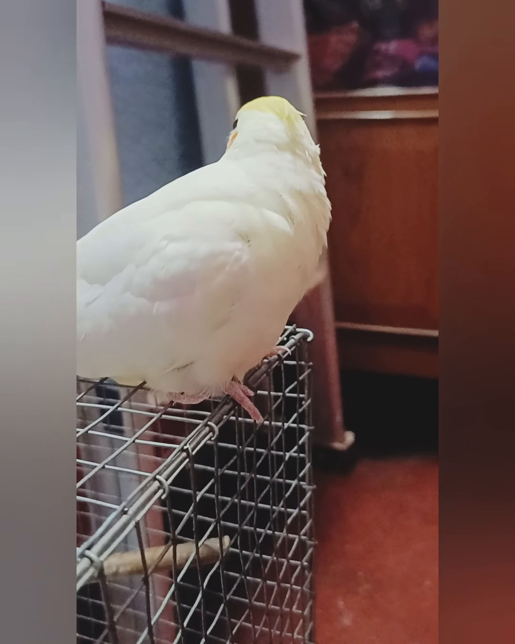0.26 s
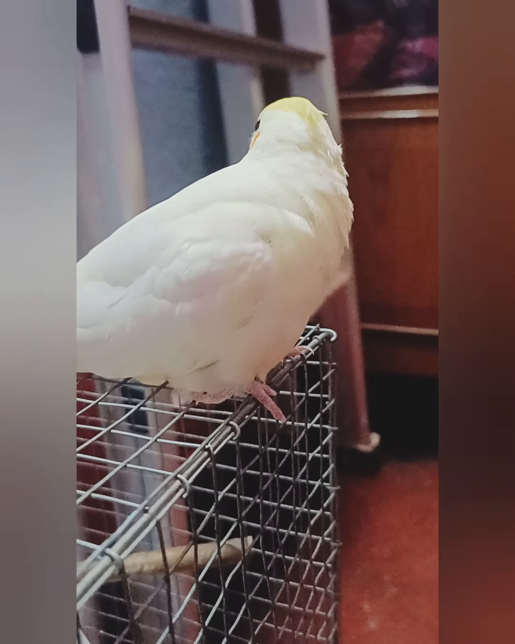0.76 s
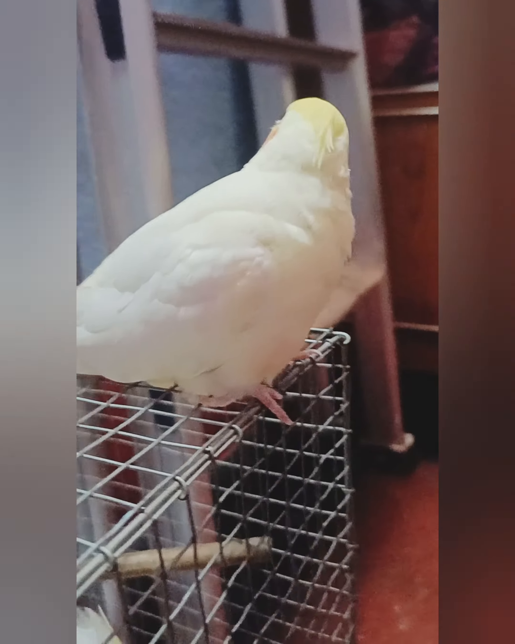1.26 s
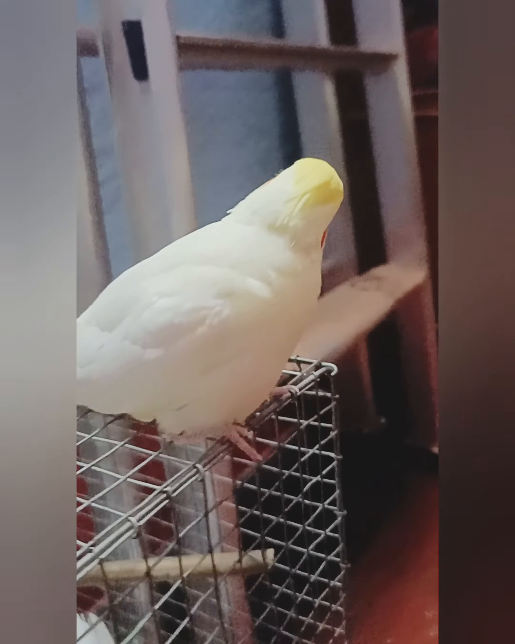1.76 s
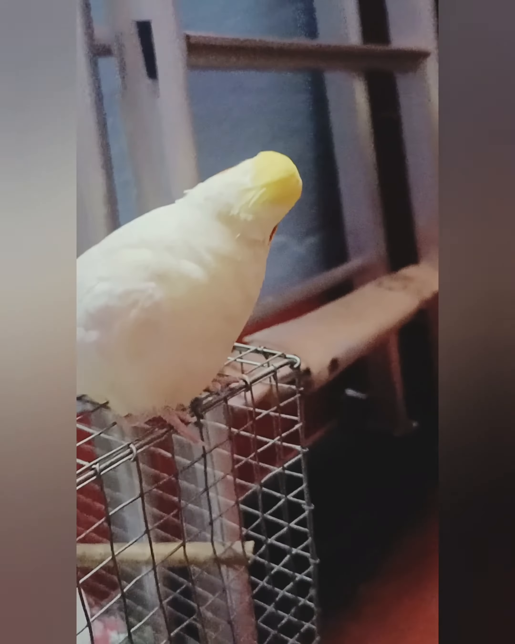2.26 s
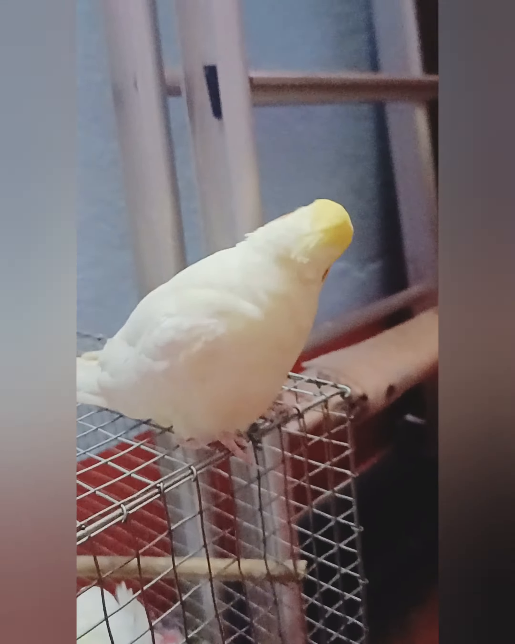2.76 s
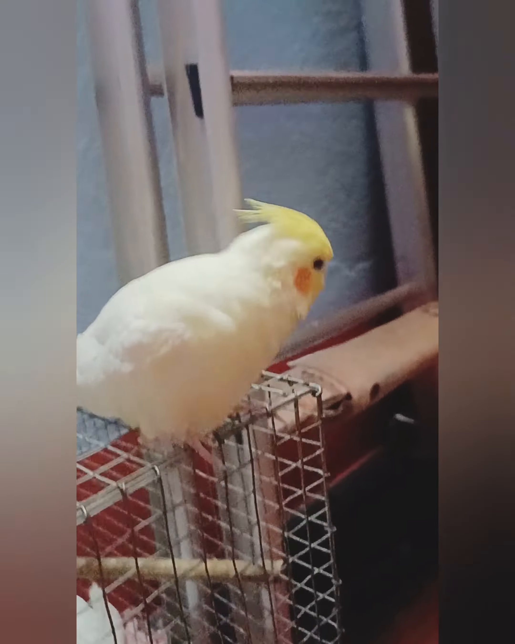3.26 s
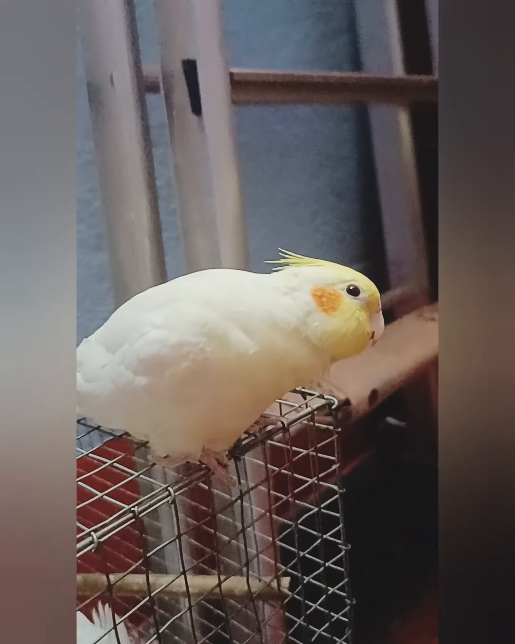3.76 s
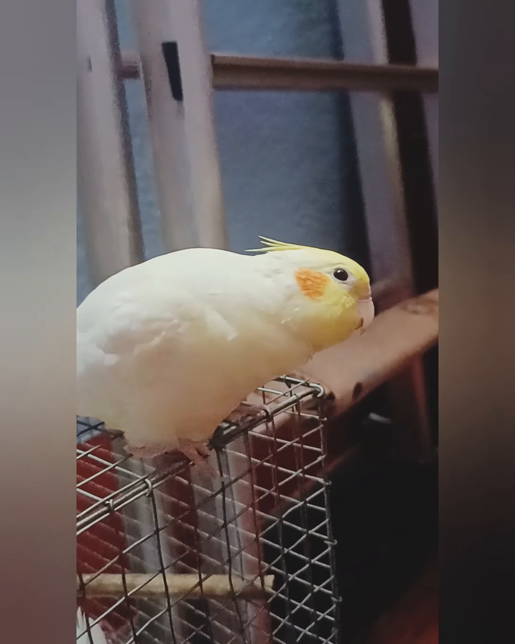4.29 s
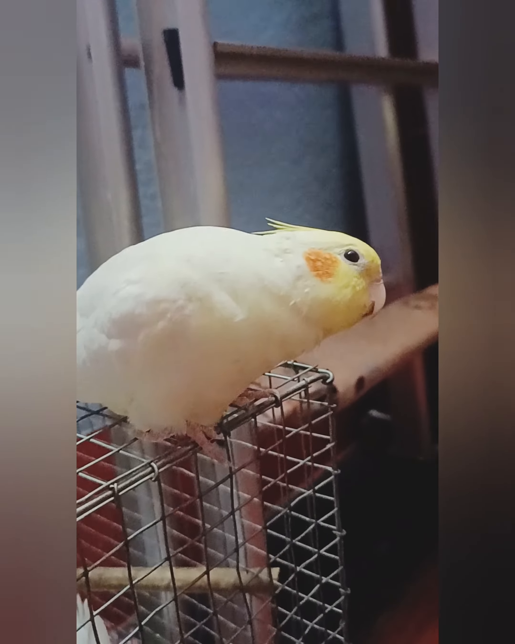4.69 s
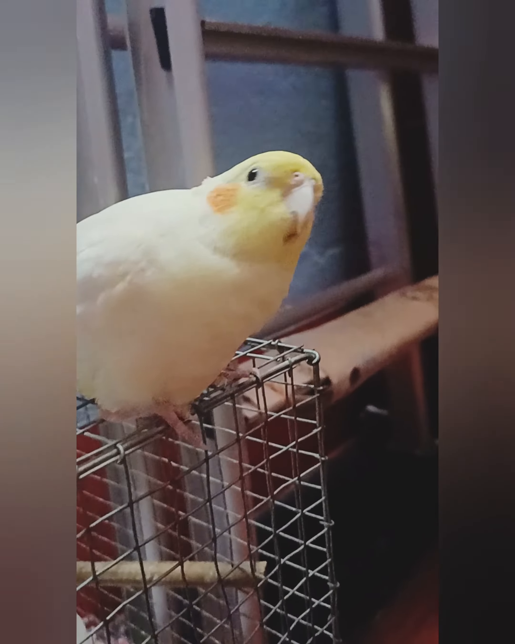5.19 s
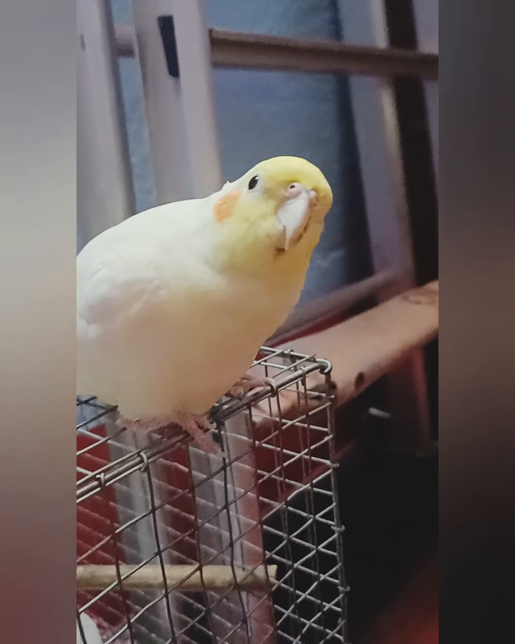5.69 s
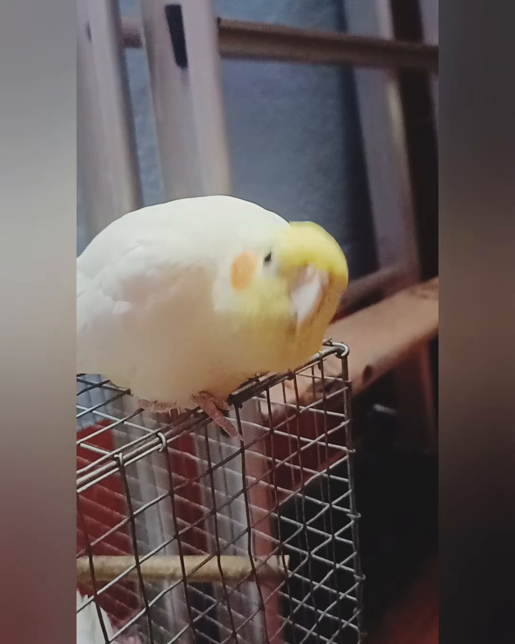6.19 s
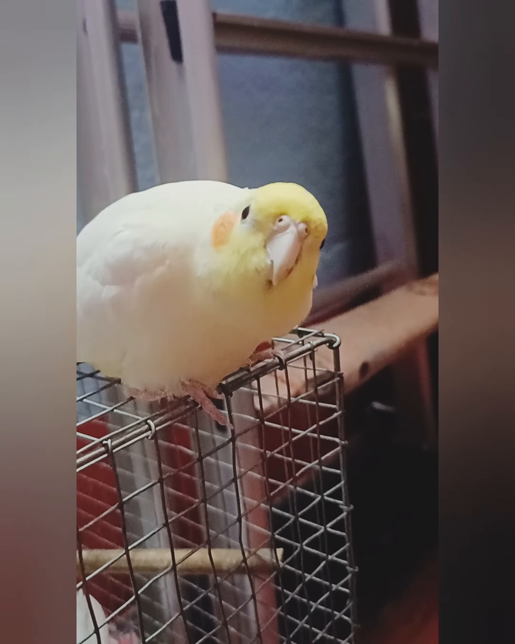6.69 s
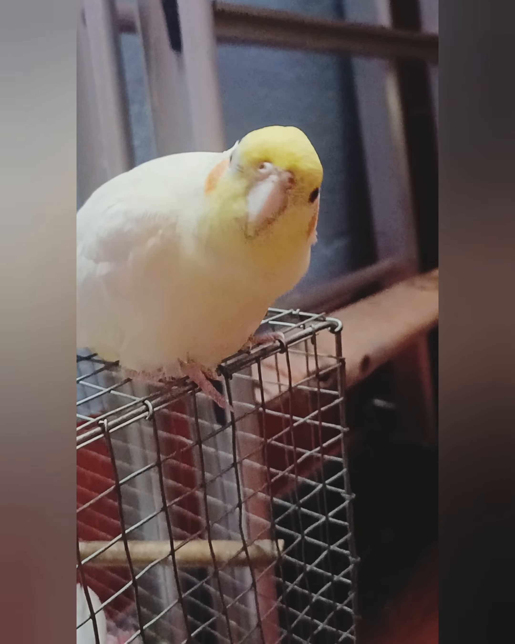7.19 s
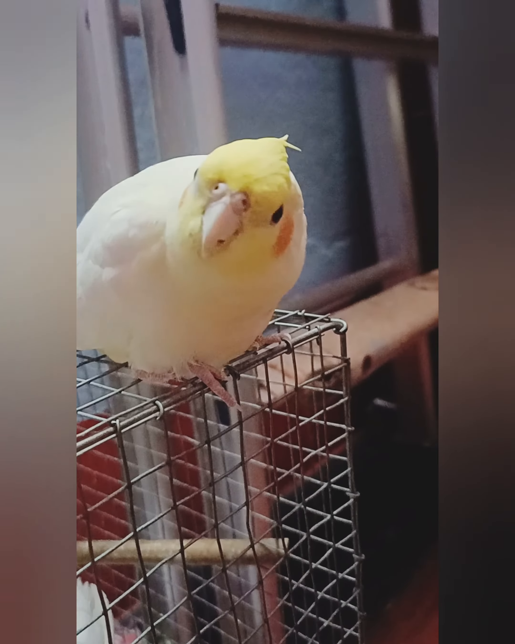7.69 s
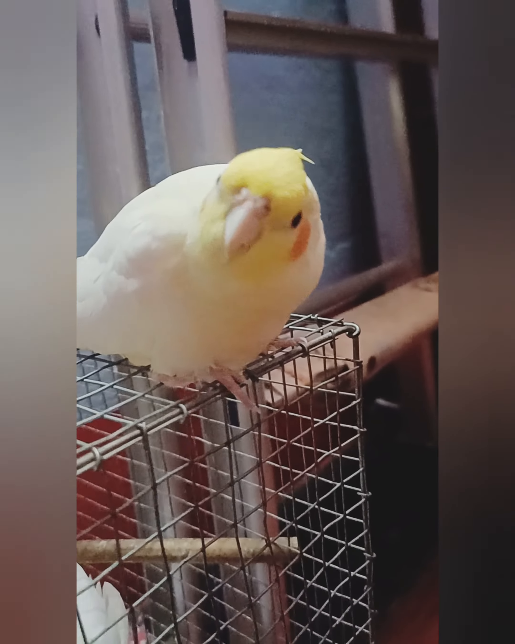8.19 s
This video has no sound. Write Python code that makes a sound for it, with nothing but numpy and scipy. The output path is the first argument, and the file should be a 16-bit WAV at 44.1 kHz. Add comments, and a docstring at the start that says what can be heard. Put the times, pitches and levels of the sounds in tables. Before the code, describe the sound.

Close, soft chirps and scratchy squeaks from a pet parrot lead to four raspy calls over a dull household hum.

```python
"""A cockatiel calls from its wire cage in a quiet room, close to a two-port microphone and a little left.
Air drives the membranes of its syrinx into oscillation: soft, mostly falling chirps, a two-voiced whine
with combination tones, a sharp chip and scratchy squeaks, then four harsh grumbles in which uneven
membrane slaps modulate the whistle. A faint feather rustle, brief handling noise and dry taps join in,
and the furniture reflects each sound over a dull household hum."""
import sys
import numpy as np
from scipy import signal
from scipy.fft import rfft, irfft, next_fast_len
from scipy.io import wavfile
from scipy.ndimage import uniform_filter1d, map_coordinates

SR = 44100
rng = np.random.default_rng(int(sys.argv[2]) if len(sys.argv) > 2 else 0)


def wrap_up_sound(samples):
    """Save the sound to the file named by the first command line argument, as 16-bit audio."""
    columns = np.atleast_2d(samples).T
    # keep every value between -1 and 1, then stretch to whole-number steps
    tamed = np.clip(columns, -1, 1)
    steps = np.round(tamed * 32767).astype(np.int16)
    wavfile.write(sys.argv[1], SR, steps)


N = 372644
T = np.arange(N) / SR

# Resonances of the throat: frequency_hz, gain_db
THROAT_RESPONSE = [(300, -14), (700, -18.5), (1000, -3), (1250, 1.5), (1600, 1.5), (1950, -8), (2150, -4.5),
                   (2900, -11.5), (4000, -18.5), (6500, -30)]
# Noise spectra of the membrane ticks, the wheeze and the open beak: frequency_hz, density_db
TICK_SPECTRUM = [(2000, -43), (2800, -8), (3600, 5), (5200, -16), (6500, -26.5), (7400, -8), (8400, 6.5),
                 (9500, 6.5), (10700, -7), (12600, -19), (13600, -33), (15500, -29)]
WHEEZE_SPECTRUM = [(40, -23.5), (90, 8), (250, 0), (600, 4), (1100, 5), (1900, 6.5), (2600, 0.5),
                   (3600, -9.5), (5200, -26), (6500, -51), (9000, -33), (15000, -57)]
GAPE_SPECTRUM = [(700, -3.5), (1000, -26), (1400, 10), (1900, 17.5), (2700, 12), (3200, -44), (4200, -4),
                 (5100, 3.5), (6500, -93.5), (9500, -12), (12400, 1.5), (14000, -36), (15500, -32)]
def grumbles(flutter_hz=78, interval=1.46, kick_rad=.95, bend_rad=2.5, gain_db=2,
             octave_db=-5, sum_db=-4, third_db=-28, fourth_db=-20, wheeze_db=-20, gape_db=-4):
    """Amplitude and phase modulation: rattle and flutter spread two whistles into harsh sidebands."""
    level, pitch_hz, rough, flutter, gape, tick_db, second_db = grumble_controls()
    swing, tick, kick, cycle = rattle()
    chop = np.clip(rough, 0, 1)
    # each slap holds the whistle back and it runs sharp until the next, lifting the upper sidebands
    slap_phase = chop * (kick_rad * kick + bend_rad * uniform_filter1d(cycle, size=24))
    low = phase_of(pitch_hz * (1 + 0.03474 * chop * drift(62.4))) + slap_phase
    high = phase_of(interval * pitch_hz * (1 + 0.0184 * drift(107)))
    second = from_db(second_db) * (np.sin(high) + from_db(sum_db) * np.sin(low + high))
    whistle = colour(np.sqrt(2) * (1 - chop + chop * swing) * (np.sin(low) + second), THROAT_RESPONSE)
    # the opening beak frees the even harmonics
    even = from_db(octave_db) * np.sin(2 * low) + from_db(fourth_db) * np.sin(4 * low)
    overtones = swing * (gape * even + (1 - gape) * from_db(third_db) * np.sin(3 * low))
    ticks = from_db(tick_db) * rms_one(colour(tick * rng.standard_normal(N), TICK_SPECTRUM))
    wheeze = from_db(wheeze_db) * np.sqrt(chop) * noise(WHEEZE_SPECTRUM)
    air = swing * (wheeze + from_db(gape_db) * gape * noise(GAPE_SPECTRUM))
    throb = np.abs(np.sin(phase_of(flutter_hz * (1 + 0.22 * drift(24.95))) / 2)) * np.sqrt(2)
    envelope = from_db(gain_db) * level * (1 - flutter + flutter * throb)
    return envelope * (whistle + overtones + ticks + air)


# Harsh calls: start_s, length_s, attack_s, release_s, pitch_hz, end_bend_hz, relative_db,
# swell_db_per_s, flutter_s, rattle_share, gape_share, tick_db, second_voice_db
GRUMBLE_CALLS = [(6.418, .207, 0.11, 0.032, 1287, 14.5, -45, 1, 0.086, 0.91, 0.14, -21.5, -14.5),
                 (6.712, .255, 0.034, 0.064, 1275, 170, -45.5, 29, 0.00092, 1, 0.22, -13, -13),
                 (7.529, .142, .058, 0.008, 1213, -100, -46, 2, 0.152, 0.65, .06, -23.5, -22),
                 (7.85, 0.53, 0.038, 0.017, 1253, -0.5, -41.5, 23, .14, 0.56, 0.05, -22, -24.5)]
# The last grumble clears, then the beak opens for a screech:
# time_s, shift_hz, change_db, added_rattle_share, added_gape_share
SCREECH_CURVE = [(8.18, -0.5, -1.5, -0.015, 0), (8.245, -40, 2.5, -0.37, 0.024), (8.29, 40, -2, -.05, 0.26),
                 (8.343, 90.5, -6.5, 0.16, 0.28), (8.365, -1, -2, 0.069, 0)]
def grumble_controls(bend_s=.08, flutter_depth=.8, fade_s=.04, swoop_s=.03, clear_s=0.086):
    """Slow modulation: a grumble stutters, a little flat, until the air flows freely."""
    controls = np.zeros((7, N))
    for (start, length, attack, release, hz, bend_hz, db, swell,
         flutter_s, rough, gape, tick_db, second_db) in GRUMBLE_CALLS:
        at = slice(int(start * SR), int((start + length) * SR))
        age = T[at] - start
        shift_hz, change_db, more_rough, more_gape = in_time(SCREECH_CURVE, T[at])
        flutter = flutter_depth * ramp((flutter_s - age) / fade_s)
        # without a stutter it swoops in from above, with less rattle and a strong second voice
        direct = 1 - ramp(flutter_s / fade_s)
        swoop = direct * np.exp(-age / swoop_s)
        clear = direct * ramp(2 - 2 * age / clear_s)
        level = from_db(db + swell * (age - length / 2) + change_db)
        bent_hz = hz + bend_hz * ramp(1 + (age - length) / bend_s) + shift_hz
        controls[:, at] = (gate(age, 0, length, attack, release) * level,
                           bent_hz * (1 + .12 * swoop - .04 * flutter),
                           (rough + more_rough) * (1 - 0.61 * clear),
                           flutter,
                           gape + more_gape,
                           tick_db + 6.5 * flutter - 43 * more_gape,
                           second_db + 15 * clear + 66 * more_gape)
    return controls


def rattle(rate_hz=330, spread_db=2.0, tick_s=0.0019):
    """Impulse excitation: each uneven membrane slap leaves a decaying swing, a tick and a phase kick."""
    turns = phase_of(rate_hz * from_db(1.8 * drift(220) + .7 * drift(20))) / (2 * np.pi)
    count, cycle = turns.astype(int), turns % 1
    size, kick = rng.standard_normal((N // 20, 2))[count].T
    strength = from_db(spread_db * size)
    swing = uniform_filter1d(strength * np.exp(-2 * cycle), size=18)
    tick = strength * np.exp(-cycle / rate_hz / tick_s)
    return rms_one(swing), rms_one(tick), uniform_filter1d(kick, size=60), cycle


# Effort through the whine: time_s, low_voice_db, high_voice_db, roughness
WHINE_EFFORT = [(3.304, -51, -55.5, 0.8), (3.325, -47, -46.5, .7), (3.355, -41, -53, 0.12),
                (3.44, -41, -56, .06), (3.51, -42.5, -52.5, .25), (3.593, -39.5, -42.5, .28),
                (3.62, -37.5, -50.5, .1), (3.66, -32.5, -52, .1), (3.688, -41, -54.5, .14)]
def whine(start_s=3.304, end_s=3.689, low_jitter=0.0696, high_jitter=0.15, waver=0.0086, shimmer=1.1,
          octave_db=-20, third_db=-36, sum_db=-11, mirror_db=-4, wheeze_db=-28, gain_db=3):
    """Nonlinear coupling: the two sides of the syrinx share one air stream and make combination tones."""
    low_hz, high_hz = whine_pitches(start_s, end_s)
    low_db, high_db, rough = in_time(WHINE_EFFORT)
    low = phase_of(low_hz * (1 + low_jitter * rough * drift(207) + waver * drift(53.9) / 2))
    high = phase_of(high_hz * (1 + high_jitter * rough * drift(300) + waver * drift(37)))
    pressed_db = 0.96 * (low_db - np.median(np.array(WHINE_EFFORT)[:, 1]))   # harmonics grow with effort
    harmonics = from_db(octave_db) * np.sin(2 * low) + from_db(third_db) * np.sin(3 * low)
    lower = np.sin(low) + from_db(pressed_db) * harmonics
    lower *= 1 + shimmer * rough * np.tanh(drift(300))
    combinations = from_db(sum_db) * np.sin(low + high) + from_db(mirror_db) * np.sin(3 * low - high)
    upper = np.sin(high) + combinations
    voices = from_db(low_db + 1.5 * drift(35)) * lower + from_db(high_db + 1.4 * drift(60)) * upper
    air = from_db(low_db + wheeze_db) * noise(WHEEZE_SPECTRUM)
    return from_db(gain_db) * (colour(voices, THROAT_RESPONSE) + air) * gate(T, start_s, end_s, .004, .01)


def whine_pitches(start_s, end_s, swoop_s=0.031, base_hz=1103, top_hz=1247.7, top_s=3.5,
                  rise_hz_per_s=1150, sag_hz_per_s=520, high_hz=1670, wander=0.021):
    """Frequency glide: both voices swoop down, then the low one arches and the high one holds."""
    t = np.clip(T, start_s, end_s)
    swoop = 1 + .72 * np.exp(-((t - start_s) / swoop_s) ** 2)
    arch_hz = top_hz - np.maximum(rise_hz_per_s * (top_s - t), sag_hz_per_s * (t - top_s))
    return np.maximum(arch_hz, base_hz) * swoop, high_hz * swoop * (1 + wander * drift(14))


# Chips and squeaks: start_s, length_s, attack_s, low_hz, low_db, squeak_hz, squeak_db,
# roughness, overtone_db, hiss_db
CHIP_NOTES = [(0.144, 0.035, .006, 3320, -63, 4260, -69, 0.29, -34, -73.5),
              (0.811, 0.062, 0.019, 1822, -54.5, 3660, -67, 1.09, -9.5, -67),
              (3.26, 0.046, 0.0017, 1725, -60, 3000, -63, 0.75, -15, -74),
              (3.968, .019, .0011, 1737, -32.5, 3100, -53, 0.48, -15.5, -57),
              (4.209, 0.049, 0.0051, 1588, -59.5, 3127, -64.5, 0.95, -6, -83),
              (4.451, 0.044, 0.011, 1700, -69, 3090, -71, 0.6, -14, -85),
              (4.831, .062, 0.0023, 1810, -52.5, 5890, -58, 1.09, 0.5, -62.5),
              (5.828, 0.016, 0.0021, 1733, -67, 4004, -49.5, 0.57, -8, -64),
              (6.14, 0.032, 0.0027, 1501, -47.5, 3650, -56.5, 0.89, -12, -60.5)]
def chips(low_sag=.84, squeak_sag=0.79, fall_share=0.24, gain_db=-3):
    """Biphonation: a low voice and a squeak sound at once in abrupt notes, both sagging in pitch."""
    tone, air = np.zeros((2, N))
    low_wobble, high_wobble = membrane(), membrane()
    for (start, length, attack, low_hz, low_db, squeak_hz, squeak_db,
         rough, overtone_db, hiss_db) in CHIP_NOTES:
        at = slice(int(start * SR), int((start + length) * SR))
        shape = gate(T[at], start, start + length, attack, fall_share * length)
        low = note(low_hz, low_hz * low_sag, rough, low_wobble[:, at], overtone_db, overtone_db - 8)
        squeak = note(squeak_hz, squeak_hz * squeak_sag, rough, high_wobble[:, at],
                      octave_db=-12, twelfth_db=-20)
        tone[at] += shape * from_db(gain_db) * (from_db(low_db) * low + from_db(squeak_db) * squeak)
        air[at] += shape * from_db(hiss_db)
    return through_beak(tone, air, low_swell_db=-8)


# Soft chirps: start_s, length_s, clear_share, from_hz, to_hz, clear_db, rasp_db,
# rasp_roughness, octave_db, twelfth_db, hiss_db
CHIRP_NOTES = [(0.102, 0.087, .53, 2630, 1950, -63.5, -61.5, 0.41, -13.5, -24.5, -63),
               (0.331, 0.099, 0.26, 2782, 2890, -63.5, -67, 0.42, -17, -12, -64.5),
               (0.542, 0.078, 0.23, 2466, 1510, -61.5, -73, 0.65, -10.5, -22, -64),
               (0.842, 0.081, 0.4, 1673, 1228, -45, -54, 0.96, -19, -43, -65.5),
               (1.161, 0.0417, 0.9, 1672, 1335, -47.5, -50, 0.7, -19.5, -30, -60),
               (1.208, 0.061, .95, 1148, 1124, -50, -54, .3, -15.5, -29.5, -72),
               (6.113, 0.048, 0.22, 4200, 2200, -54, -56, 0.76, -33, -36, -64.5)]
def chirps(attack_s=0.014, break_s=0.0048, fall_share=0.25, clear_rough=0.23, gain_db=-1):
    """Voice break: a sliding, nearly periodic whistle turns into an irregular, hissing rasp."""
    tone, air = np.zeros((2, N))
    wobble = membrane()
    for (start, length, clear, from_hz, to_hz, clear_db, rasp_db,
         rasp_rough, octave_db, twelfth_db, hiss_db) in CHIRP_NOTES:
        at = slice(int(start * SR), int((start + length) * SR))
        shape = gate(T[at], start, start + length, attack_s, fall_share * length)
        broken = ramp((T[at] - start - clear * length) / break_s + .5)
        rough = clear_rough + (rasp_rough - clear_rough) * broken
        level = from_db(gain_db + clear_db + (rasp_db - clear_db) * broken)
        tone[at] += shape * level * note(from_hz, to_hz, rough, wobble[:, at], octave_db, twelfth_db)
        air[at] += shape * from_db(hiss_db - 7 * (1.5 - broken))   # 7 dB more hiss after the break
    return through_beak(tone, air, low_swell_db=-3)


def membrane():
    """Jitter and shimmer: a loose membrane shakes the pitch and the strength of a note."""
    jitter = .1 * drift(600) + .05 * drift(120)
    return np.array([jitter, np.tanh(drift(320))])


def note(from_hz, to_hz, rough, wobble, octave_db, twelfth_db):
    """Harmonic series: three partials glide together, shaken by the membrane."""
    jitter, shimmer = wobble
    phase = phase_of(np.geomspace(from_hz, to_hz, len(jitter)) * (1 + rough * jitter))
    overtones = from_db(octave_db) * np.sin(2 * phase) + from_db(twelfth_db) * np.sin(3 * phase)
    return (np.sin(phase) + overtones) * rms_one(1 + rough * shimmer)


# Resonances that colour the short notes: frequency_hz, gain_db
BEAK_RESPONSE = [(500, -22), (900, -12.5), (1150, 1.5), (1800, -1.5), (2400, 2.5), (3100, 0.5),
                 (4500, -2.5), (5600, 0.5), (7000, -8.5), (8800, 5), (10200, -6.5), (11500, -29)]
# Spectra of the hiss and of the dull low noise that swells with each note: frequency_hz, density_db
HISS_SPECTRUM = [(300, -23), (900, 3), (1400, 10), (2900, 2), (4300, -7.5), (5700, -17), (7000, -9.5),
                 (8800, -8), (10000, -12), (11000, -41.5), (15000, -37.5)]
LOW_SWELL_SPECTRUM = [(40, -17.5), (90, 0.5), (450, -5.5), (850, 0), (1500, -19), (3000, -52)]
def through_beak(tone, hiss_level, low_swell_db):
    """Source and filter: the beak colours a note and its hiss; dull low noise swells with each note."""
    filtered = colour(tone + hiss_level * noise(HISS_SPECTRUM), BEAK_RESPONSE)
    return filtered + from_db(low_swell_db) * hiss_level * noise(LOW_SWELL_SPECTRUM)


# A faint feather rustle, then a brief swell of hissy handling noise: peak_s, half_width_s, level_db
RUSTLE_SWELLS = [(2.78, 0.26, -92), (3.58, 0.13, -78)]
# Noise spectrum of both swells: frequency_hz, density_db
RUSTLE_SPECTRUM = [(2000, -16.5), (4000, -3), (6000, -6), (8700, 10), (11000, -4), (15500, -4)]
# Claw and beak taps: start_s, level_db
TAP_TIMES = [(3.53, -51), (3.589, -79)]
def rustles_and_taps(tap_s=0.0025):
    """Friction and impact: a faint feather rustle, then hissy handling noise and fast-decaying taps."""
    swells = sum(from_db(db) * np.exp(-((T - s) / width) ** 2) for s, width, db in RUSTLE_SWELLS)
    rustle = swells * from_db(3.5 * drift(83)) * noise(RUSTLE_SPECTRUM)
    taps = sum(from_db(db) * (T > s) * np.exp(-np.abs(T - s) / tap_s) for s, db in TAP_TIMES)
    return rustle + taps * noise(HISS_SPECTRUM)


# Echoes off the nearby ladder, cabinet and floor: left_delay_s, right_delay_s, gain_db
REFLECTIONS = [(.0023, 0.0019, -10.5), (.0046, 0.006, -15), (.0071, 0.0067, -13.5), (0.012, 0.013, -17)]
# What the furniture throws back: frequency_hz, gain_db
FURNITURE_RESPONSE = [(1200, -0.5), (1800, 3.5), (2800, 3), (6000, 6.5), (10000, -2)]
def room(x, t60_s=.24, tail_db=-18, early_db=-15, early_s=0.019, far_wall_s=0.081, far_wall_db=-34):
    """Reflection: near echoes, scatter and a tail differ at each port; the far wall adds one slap."""
    t = T[:SR // 2]
    tail = rng.standard_normal((2, len(t))) * from_db(-60 * t / t60_s) * (t > .008)
    scatter = rng.standard_normal((2, len(t))) * (rng.random((2, len(t))) < 2000 / SR)   # 2000 a second
    early = scatter * np.exp(-t / early_s) * (t > .001)
    response = from_db(tail_db) * tail / np.linalg.norm(tail[0])
    response += from_db(early_db) * early / np.linalg.norm(early[0])
    for left_s, right_s, echo_db in REFLECTIONS:
        response[[0, 1], [int(left_s * SR), int(right_s * SR)]] += from_db(echo_db)
    dulled = colour(x, [(1300, -3), (3000, -22)])
    slap = from_db(far_wall_db) * np.interp(T - far_wall_s, T, dulled)
    return signal.fftconvolve(colour(x, FURNITURE_RESPONSE)[None], response, axes=1)[:, :N] + slap


# Household background noise: frequency_hz, density_db
ROOM_SPECTRUM = [(15, -51), (25, -11.5), (53, 2), (75, -5.5), (119, -1.5), (152, -8), (221, -6.5),
                 (305, -9.5), (340, 0), (368, -4.5), (399, -2), (469, -5.5), (1620, -15.5), (3170, -34),
                 (15500, -48)]
# Its likeness at the two ports: frequency_hz, correlation
PORT_CORRELATION = [(40, 1), (90, .93), (150, 0.6), (400, 0.67), (900, 0.00031), (2000, 0), (8000, 0)]
# Partials of the household hum: pitch_hz, relative_db
HUM_PARTIALS = [(53, -83.5), (126, -79), (216, -79), (341, -81.5)]
def room_tone(level_db=-67, waver_db=0.3, hum_db=-2):
    """Spatial coherence: dull noise is alike at both ports in the bass; a hum wavers beneath it."""
    size = next_fast_len(N)
    alike = np.clip(over_bins(PORT_CORRELATION, size), -1, 1)
    mid, side = rfft(rng.standard_normal((2, size))) * from_db(over_bins(ROOM_SPECTRUM, size))
    ports = np.sqrt(1 + alike) * mid + np.sqrt(1 - alike) * side * [[1], [-1]]
    air = rms_one(irfft(ports, size)[:, :N])
    hum = sum(from_db(db + hum_db + 2 * drift(3.5)) * np.sin(phase_of(hz + 1.6 * drift(5)))
              for hz, db in HUM_PARTIALS)
    return from_db(level_db + waver_db * drift(1)) * air + hum


# Low band on which the noise suppressor acts: frequency_hz, gain_db
SUPPRESSOR_BAND = [(40, 2), (700, -2.5), (1100, -11), (1600, -41.5)]
def suppressor(x, threshold_db=-62, range_db=23.5, lift_db=6.5, window_s=0.1):
    """Dynamic expansion: a noise suppressor lets the low band come up while the sound is loud."""
    power = uniform_filter1d(np.mean(x ** 2, axis=0), size=int(window_s * SR))
    level_db = 10 * np.log10(np.abs(power) + 1e-20)
    opening = np.clip((level_db - threshold_db) / range_db, 0, 1)
    return x + (from_db(lift_db * opening) - 1) * colour(x, SUPPRESSOR_BAND)


def from_db(db):
    """Decibels to amplitude ratio."""
    return 10 ** (np.asarray(db) / 20)


def rms_one(x):
    """Normalisation to rms 1."""
    return x / np.sqrt(np.mean(x ** 2) + 1e-20)


def in_time(rows, t=T):
    """Linear interpolation of a curve's columns at the times t."""
    times, *columns = np.transpose(rows)
    return [np.interp(t, times, column) for column in columns]


def over_bins(points, size):
    """Interpolation over log frequency at the bins of a transform."""
    hz, value = np.transpose(points)
    return np.interp(np.log(np.fft.rfftfreq(size, 1 / SR) + 1), np.log(hz), value)


def colour(x, spectrum):
    """Filtering by multiplication of spectra."""
    size = next_fast_len(x.shape[-1] + 2048)
    return irfft(rfft(x, size) * from_db(over_bins(spectrum, size)), size)[..., :x.shape[-1]]


def noise(spectrum):
    """Coloured noise of rms 1."""
    return rms_one(colour(rng.standard_normal(N), spectrum))


def drift(rate_hz):
    """Random fluctuation: low-passed noise of rms 1."""
    pole = np.exp(-2 * np.pi * rate_hz / SR)
    return rms_one(signal.lfilter([1], [1, -2 * pole, pole * pole], rng.standard_normal(N + SR))[SR:])


def phase_of(hz):
    """Phase as the integral of frequency."""
    return 2 * np.pi * np.cumsum(hz) / SR


def ramp(x):
    """Raised-cosine step as x goes from 0 to 1."""
    return np.sin(np.pi / 2 * np.clip(x, 0, 1)) ** 2


def gate(t, start, end, rise, fall):
    """Window from start to end, with rounded edges."""
    return ramp(np.minimum((t - start) / rise, (end - t) / fall))


# How far left of the microphone axis the beak is: time_s, bearing_sine
BEAK_BEARING = [(1.2, .48), (3.5, .38), (4, .24), (6.15, .28), (7.6, .46), (8.4, .4)]
# The right port against the left, deaf around 10 kHz: frequency_hz, gain_db
RIGHT_PORT_RESPONSE = [(500, 6.5), (1250, 0.5), (2000, 8), (2900, 3), (5000, 3.5), (6800, 6.5), (7900, 5.5),
                       (8900, -15), (9900, -27), (11000, -22.5), (12400, -5), (14000, -1.5), (15500, 12)]
def scene(port_span_ms=.5, shadow_db=13.5):
    """Time and level differences: the bird reaches the left port first and is shadowed at the right."""
    near = chirps() + chips() + whine() + grumbles() + rustles_and_taps()
    bearing, = in_time(BEAK_BEARING)
    lead_ms, pan_db = port_span_ms * bearing, shadow_db * bearing
    late = map_coordinates(near, [np.arange(N) - lead_ms * SR / 1000], order=3)
    left, right = np.array([near * from_db(pan_db / 2), late * from_db(-pan_db / 2)]) + room(near)
    return np.array([left, colour(right, RIGHT_PORT_RESPONSE)]) + room_tone()


# Two faint steady bands of microphone hiss: frequency_hz, density_db
SELF_NOISE_SPECTRUM = [(4600, -25.5), (5350, 4.5), (5800, -28.5), (6600, -16.5), (7200, 3), (8000, -20.5)]
def record(dry, hiss_db=-99, cutoff_hz=15750):
    """Self-noise and band limiting: faint hiss is added before the suppressor and a steep low-pass."""
    hiss = from_db(hiss_db) * np.array([noise(SELF_NOISE_SPECTRUM), noise(SELF_NOISE_SPECTRUM)])
    low_pass = signal.ellip(10, .1, 80, cutoff_hz, fs=SR, output="sos")
    return signal.sosfilt(low_pass, suppressor(dry + hiss))


dry = scene()
out = record(dry)
wrap_up_sound(out)
```